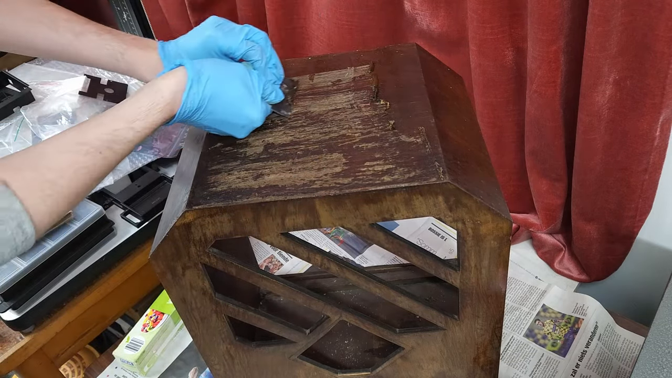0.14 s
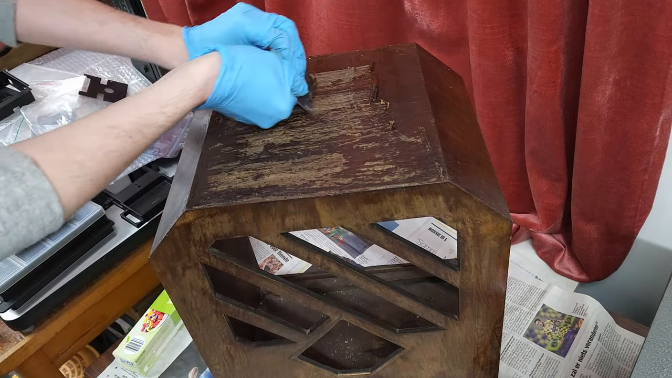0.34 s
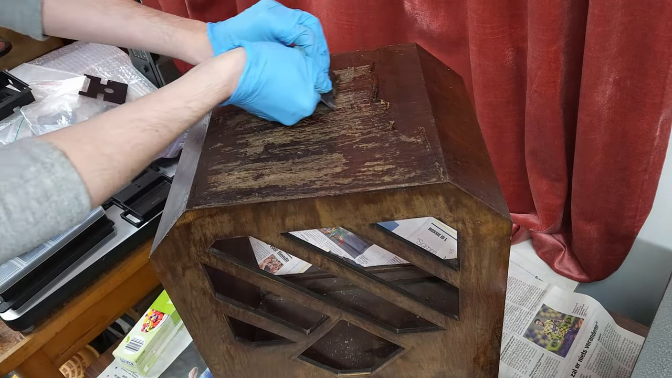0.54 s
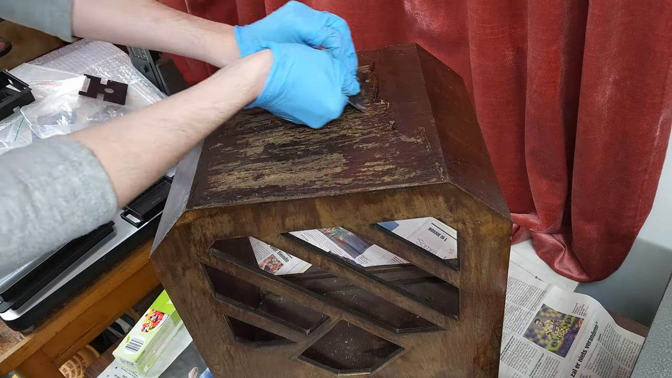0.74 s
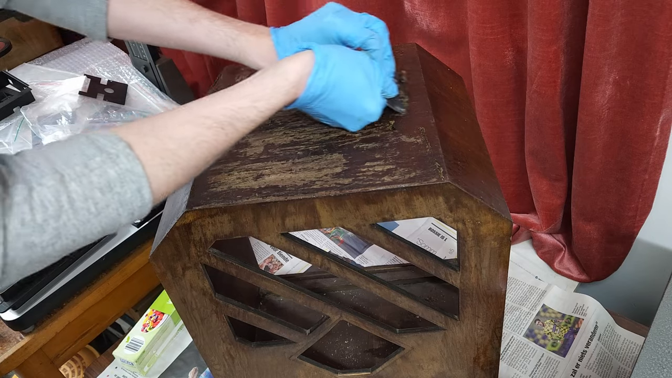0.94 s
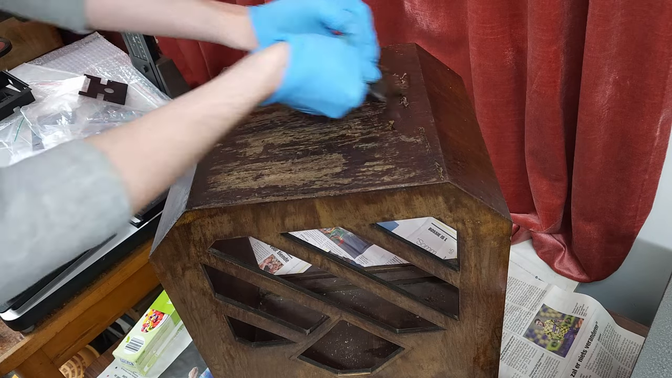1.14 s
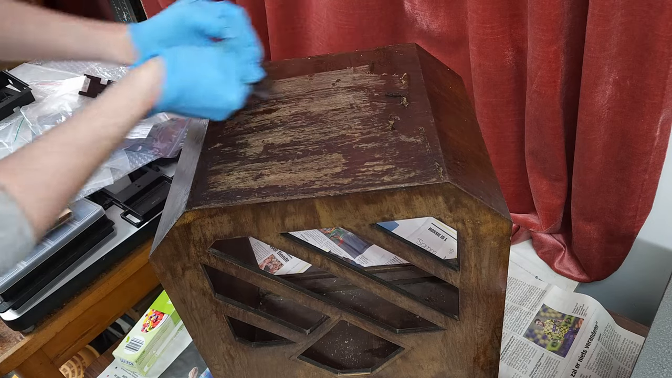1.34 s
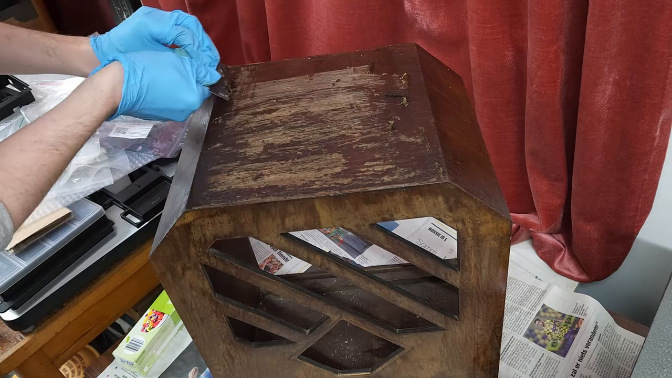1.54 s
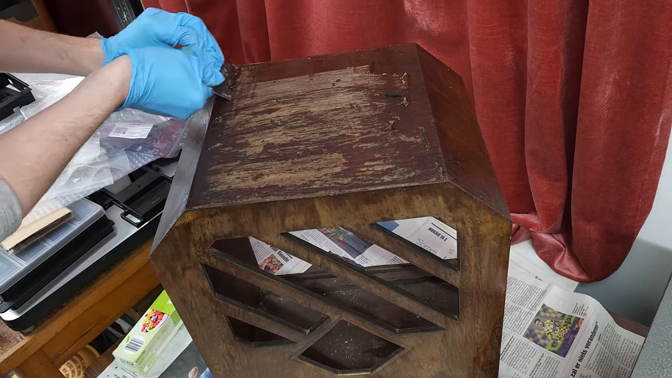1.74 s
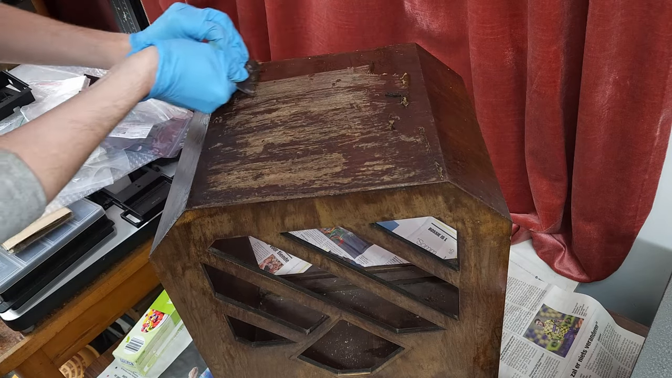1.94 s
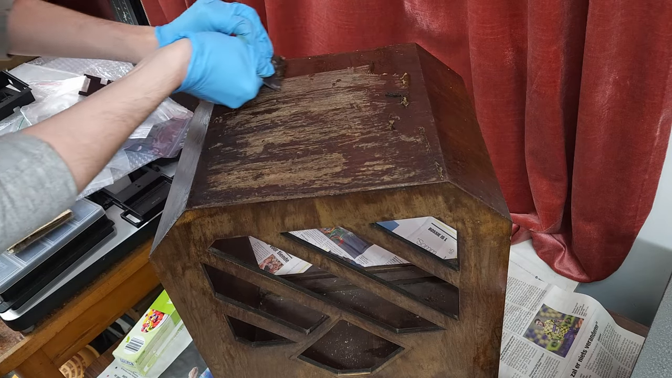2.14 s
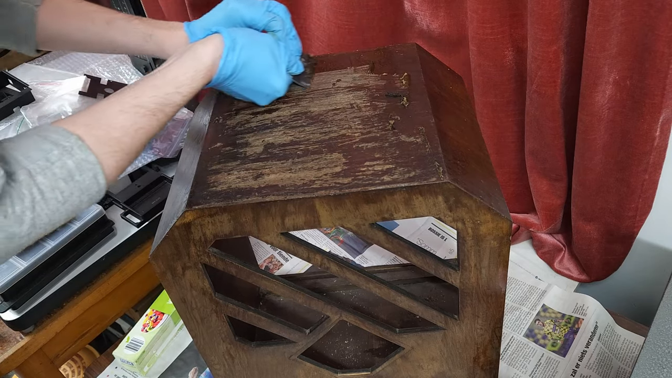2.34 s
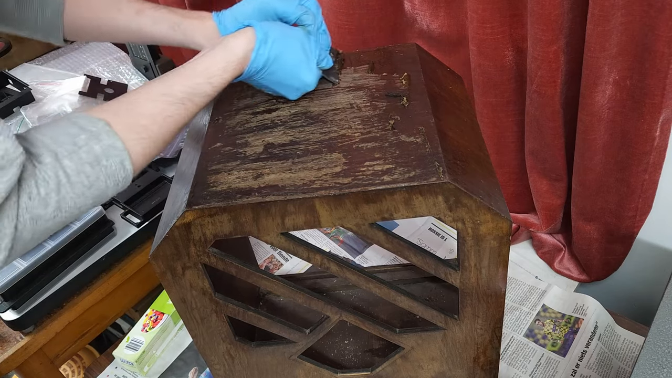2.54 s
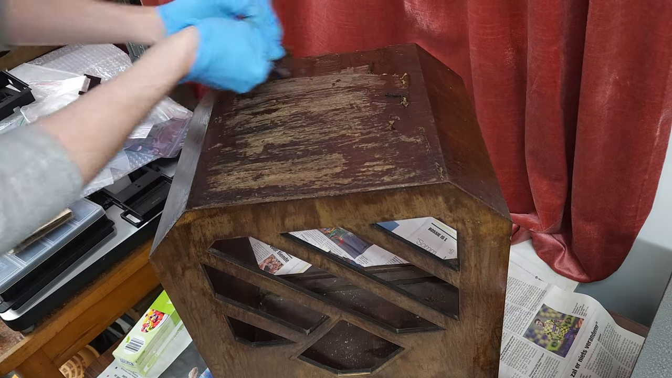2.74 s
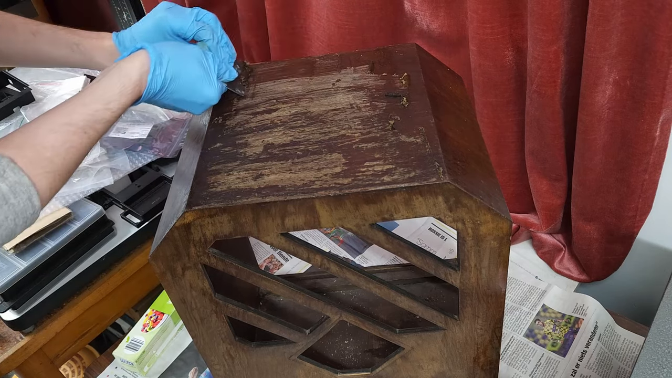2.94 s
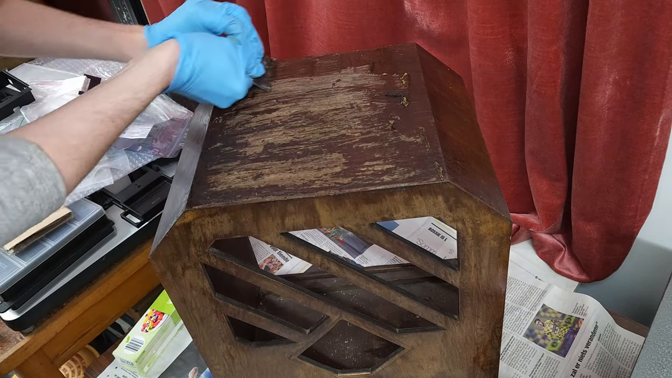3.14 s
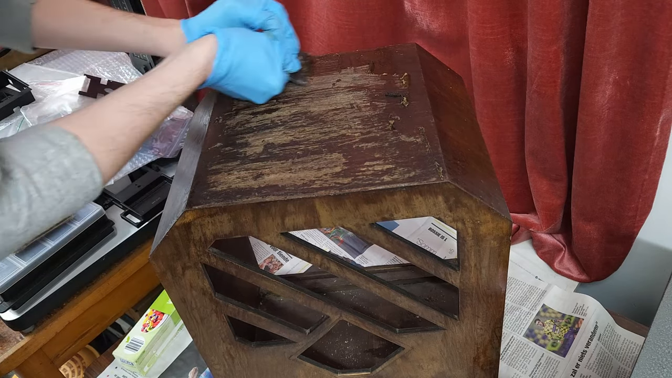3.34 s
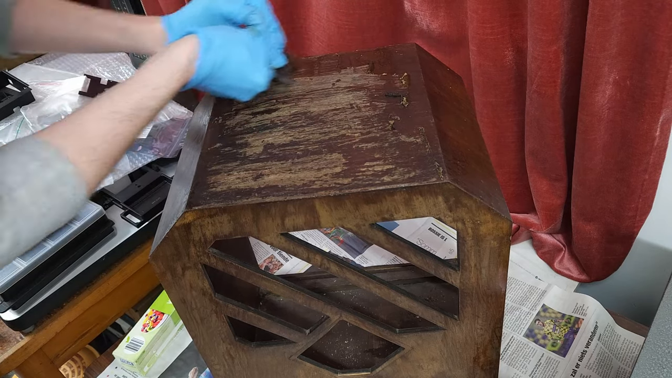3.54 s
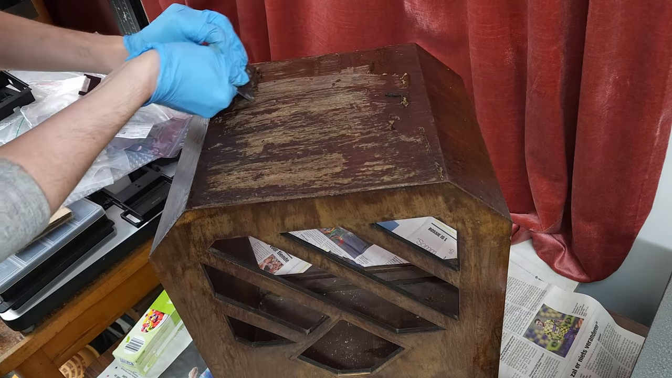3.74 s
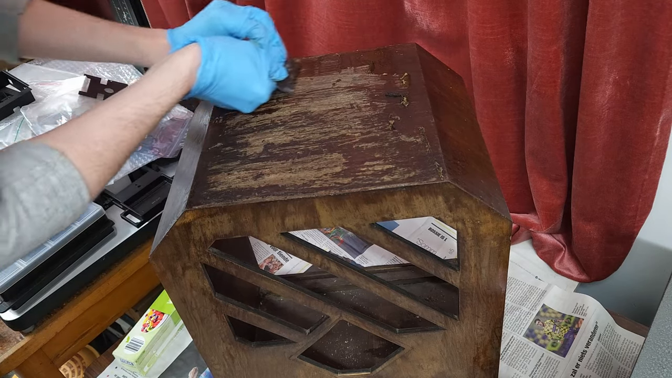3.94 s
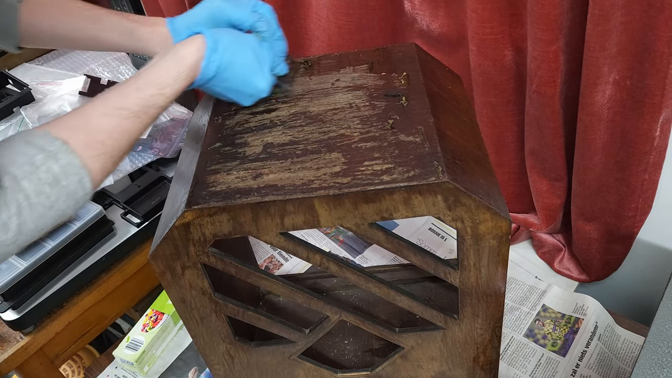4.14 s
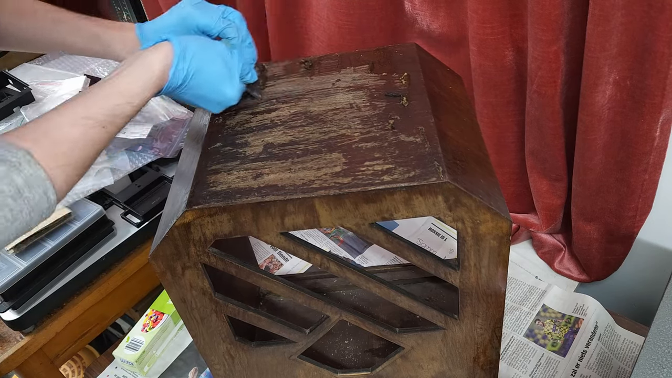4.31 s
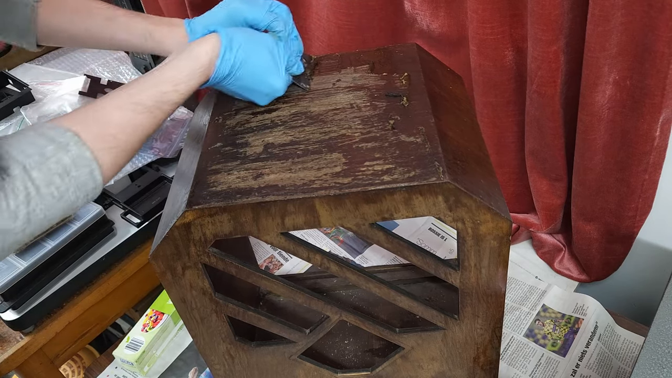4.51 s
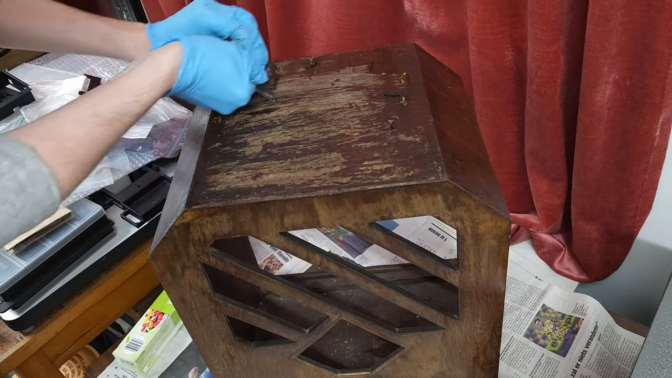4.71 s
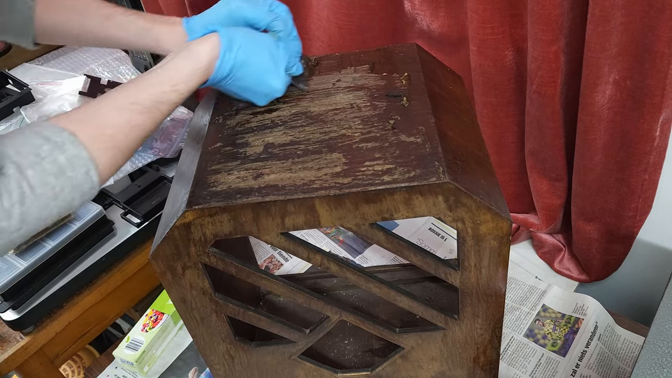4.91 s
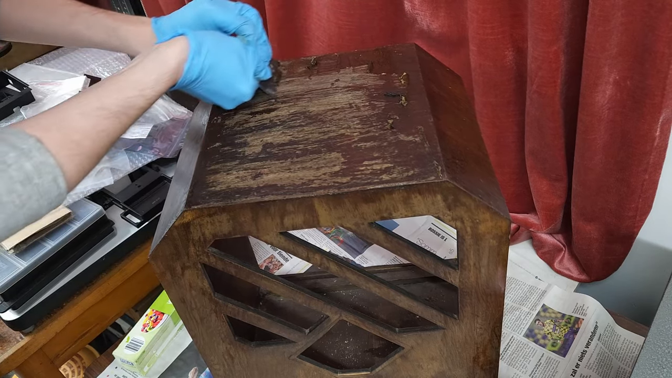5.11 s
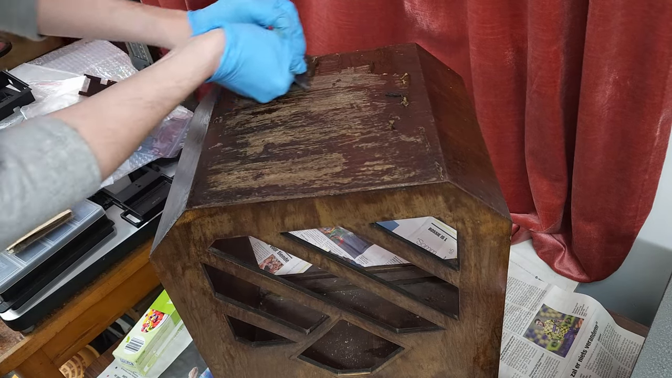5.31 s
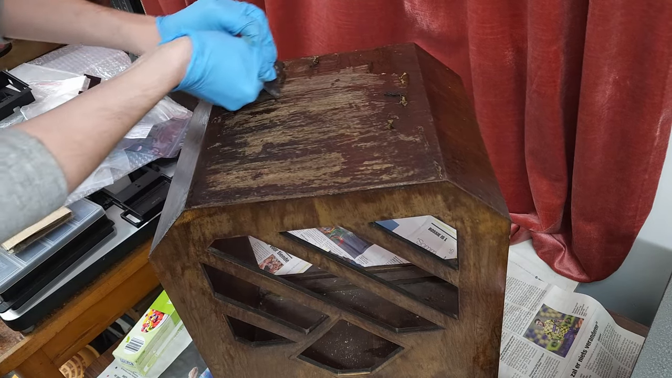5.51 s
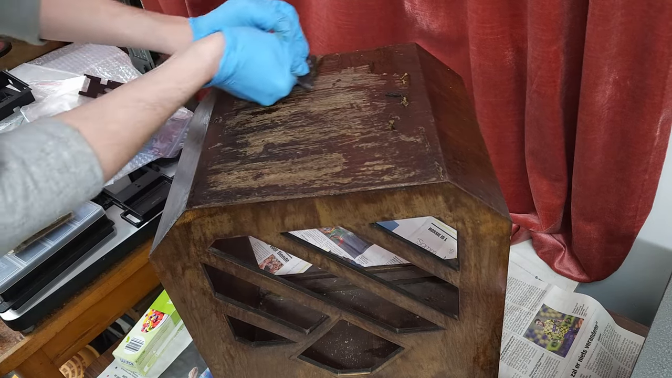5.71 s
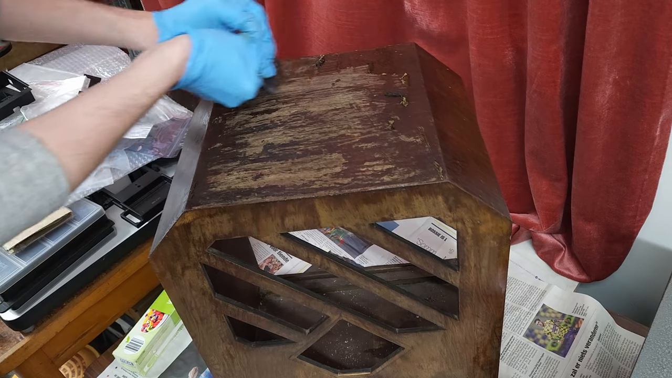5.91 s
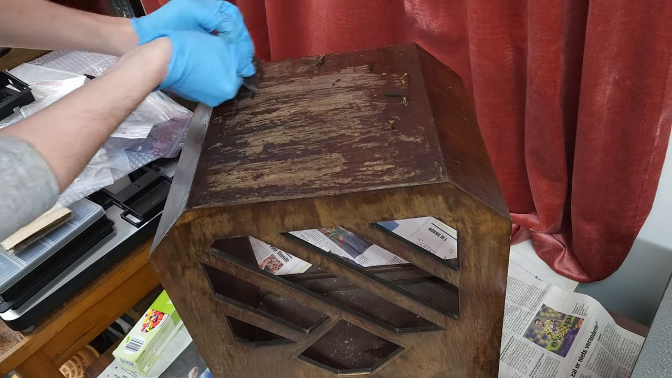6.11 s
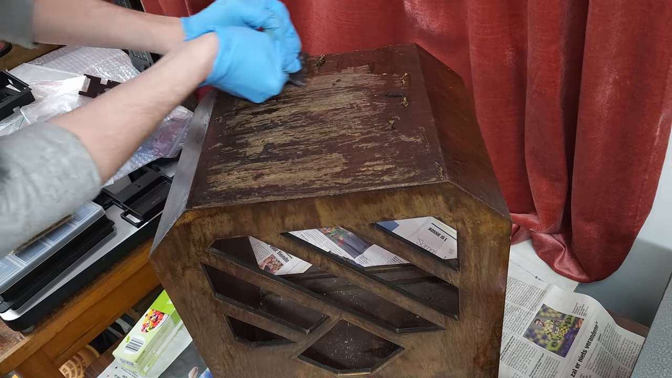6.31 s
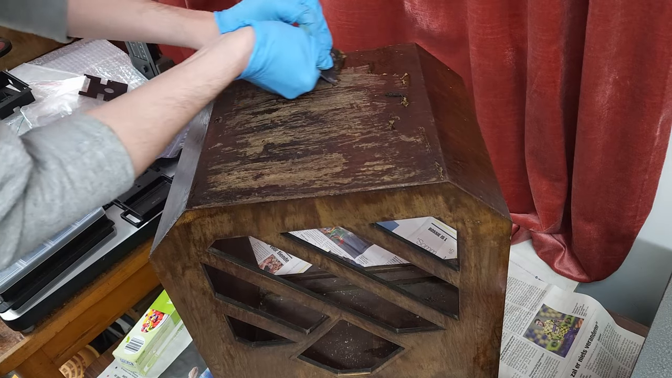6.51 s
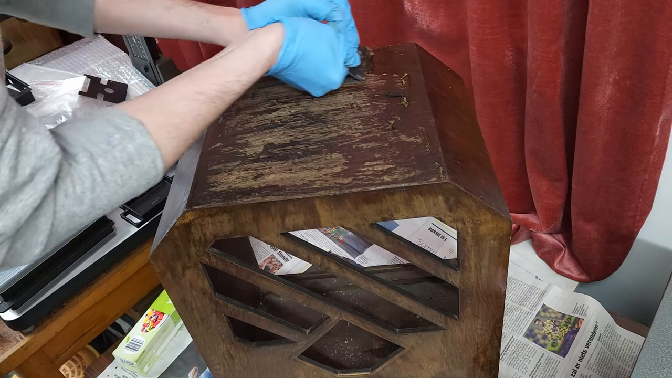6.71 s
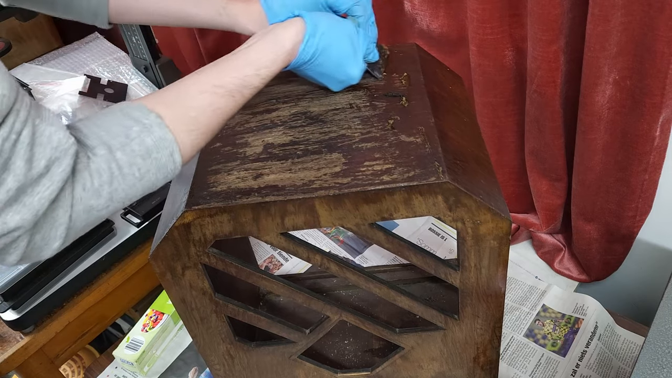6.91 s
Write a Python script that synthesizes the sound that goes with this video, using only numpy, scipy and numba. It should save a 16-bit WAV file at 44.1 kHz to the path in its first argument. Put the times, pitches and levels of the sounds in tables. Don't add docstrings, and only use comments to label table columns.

```python
import sys
import numpy as np
from scipy import signal
from scipy.fft import rfft, irfft, next_fast_len
from scipy.io import wavfile
from scipy.ndimage import uniform_filter1d
from numba import njit

SR = 44100
rng = np.random.default_rng(int(sys.argv[2]) if len(sys.argv) > 2 else 0)


def volts(x):
    e = np.asarray(x, float) / 20
    return 10 ** e


def pcm_store(signal):
    levels = np.round(np.clip(np.atleast_2d(signal), -1, 1) * 32767)
    wavfile.write(sys.argv[1], SR, levels.astype(np.int16).T)


N = 306936
SIZE = next_fast_len(N + SR // 2)
HZ = np.arange(SIZE // 2 + 1) * SR / SIZE + 1e-3
TIME = np.arange(N) / SR

# [t/s, tearing level/dB, brightness of a fast edge/dB,
# load on the wood/dB, panel level as the blade lies over open panel or frame/dB]
FIRST_END = [(0, -52, -5.5, -42, 1.5), (0.105, -53.5, -4.5, -43, 2), (0.235, -64.5, -9, -50, 4.5),
             (0.261, -64.5, -10, -48.5, 2), (0.304, -63.5, -13, -61, 11.5), (0.345, -76, -11, -66, 12)]
FIRST_ACROSS = [(0.344, -66.5, -13.5, -66.5, 13), (.458, -52, -6, -56.5, 4.5), (.616, -51.5, -5, -45, -1.5),
                (.746, -52.5, -4, -53, 3), (.83, -51.5, -4, -51.5, -6), (.878, -56.5, -1.5, -66, -8),
                (.96, -58.5, -2.5, -47.5, -27), (1.024, -63, -2.5, -54, -14), (1.086, -97, 2, -68, 4)]
SECOND_BITE = [(1.72, -100.0, -16.0, -80, -6.0), (1.791, -84.5, -6, -67, -8), (1.894, -56, -6.5, -60, 4),
               (1.92, -58, -0.5, -39, -6.5), (1.971, -52.5, -5.5, -45.5, 5.5), (2.027, -56, -2.5, -35, -6),
               (2.174, -54, -7, -36.5, -5.5), (2.211, -57.5, -5, -50, 7)]
SECOND_ON = [(2.21, -57.5, -6.5, -47.5, 2.9), (2.304, -51, -6.5, -47, 6.2), (2.348, -50.5, -7.5, -37.5, 1),
             (2.428, -52.5, -7.5, -39.5, 1.5), (2.483, -54.5, -4.5, -47.5, 0.5),
             (2.574, -49, -10, -52.5, 4.8), (2.635, -72.5, -2, -52, 6.7)]
SECOND_LIFT = [(2.635, -76, -3, -52, -9), (2.667, -53.5, -2, -65.5, 9), (2.739, -83, 0.5, -59.5, -7),
               (2.86, -112.0, 11, -91, 7)]
THIRD = [(3.04, -83, -10, -65, -15), (3.077, -53.5, -8.5, -41, -4), (3.133, -48, -1, -31.5, 3.5),
         (3.209, -59.5, -6.5, -51.5, 7), (3.274, -50, -7.5, -40.5, -1), (3.431, -50, 0, -44.5, 5.5),
         (3.545, -82.5, -3, -53.5, 1.5), (3.6, -101.5, 12, -77, -4)]
FOURTH = [(3.78, -110, 1, -104, 4), (3.816, -56.5, -6.5, -48.5, 6), (3.879, -48.5, -0.5, -38, -0.5),
          (4.076, -51, -5, -45, 0), (4.124, -72, -4, -69.5, 21.5)]
LAST = [(6.125, -81, -6, -59, -31), (6.178, -55.5, -2.5, -38, 5.5), (6.224, -48, -1.5, -41, 1),
        (6.283, -49.5, 0, -40.5, 0.5), (6.442, -59, -7.5, -50, 5), (6.6, -61.5, -8.5, -59.5, 4.5),
        (6.741, -65.5, -10.5, -67, 5), (6.862, -63.5, -8.5, -59.5, 1), (6.96, -91, -15, -70, 2)]
SLOW_STROKES = (FIRST_END, FIRST_ACROSS, SECOND_BITE, SECOND_ON, SECOND_LIFT, THIRD, FOURTH, LAST)

# [start t/s, end t/s, tearing level/dB, brightness/dB, load level/dB]
PUSHES = [
    (4.363, 4.635, -43, -1.5, -39),
    (4.825, 5.056, -45.5, -3, -41),
    (5.238, 5.46, -41.5, -1, -36),
    (5.64, 5.848, -45.5, -3.5, -47),
]
PULLS = [
    (4.108, 4.401, -49, 1.7, -52),
    (4.587, 4.855, -51, -1.5, -53.5),
    (5.01, 5.257, -50, -0.5, -52),
    (5.415, 5.635, -52, -1, -51.5),
    (5.824, 6.165, -52, 4, -67),
]
# [fastest at/share of length, sharpness, most loaded at/share, its sharpness,
# panel level/dB, brightness lost at the turns/dB, carcass level/dB]
PUSH = (0.4, 3, 0.5, 1, 0.5, 4, -2)
PULL = (0.4326, 3.5, 0.58, 0.6, 6, 12.5, -0.5)
START_DELAY_S = 0.0076
SKIM_DB = 3.5

# [t/s, level/dB]
TICKS = [
    (2.4, -60),
    (3.428, -63),
    (5.09, -59.5),
    (0.49, -83),
]
TICK_S = 0.0077
# [t/s, level/dB, length/s]
LURCHES = [(0.041, -57, 0.042), (0.777, -48.5, 0.06), (0.947, -54.5, 0.058), (2.03, -40.5, 0.044),
           (2.207, -49, 0.017), (2.292, -45.5, 0.037), (3.187, -41, 0.046), (3.87, -58, 0.072),
           (4.05, -49.5, 0.012), (4.393, -45.5, 0.034), (4.91, -46, 0.078), (5.097, -46, 0.029),
           (5.281, -38.5, 0.025), (5.754, -51, 0.074), (6.182, -45, 0.047), (4.128, -53.5, 0.028),
           (1.948, -52, 0.047), (2.495, -54, 0.028), (5.445, -50.5, 0.1)]
# [t/s, level/dB, length/s]
LOCKS = [(3.738, -63, 0.018), (4.297, -43, 0.032), (4.48, -42.5, 0.038), (4.57, -52, .01),
         (4.748, -44, 0.047), (4.967, -43, 0.027), (5.147, -41.5, 0.06), (5.377, -32.5, 0.018),
         (5.944, -54.5, 0.061), (6.065, -46, .028), (3.142, -35, 0.0089), (4.94, -41, 0.012),
         (5.06, -50, 0.022), (5.453, -43.5, 0.022), (6.285, -34, 0.01), (6.397, -36, 0.0065),
         (6.58, -58, .015), (6.66, -50, 0.0071), (6.785, -54.5, 0.013)]
# [t/s, loss/dB, length/s]
FALTERS = [(.22, 16, 0.011), (0.39, 10, 0.022), (0.524, 16, .01), (1.95, 7, 0.016), (2.475, 16, 0.0079),
           (3.208, 11, .01), (3.417, 14, 0.011), (3.487, 20, 0.011), (3.891, 25, 0.0085),
           (4.058, 18, 0.0081), (4.53, 29, 0.01), (4.601, 24, 0.0091), (5.35, 22, 0.0072),
           (5.846, 22, 0.031), (6.245, 8, 0.0087), (6.474, 19, 0.007), (6.602, 18, 0.0091),
           (6.831, 15, .008)]

# [f/Hz, level/dB per Hz]
TEAR = [(500, -15), (800, -15), (1000, -7.5), (2000, -3), (3000, -6), (4200, -10), (6000, -13.5),
        (8000, -15), (9200, -22.5), (9600, -38), (10300, -42.5), (13000, -49), (15700, -46)]
# [f/Hz, width/Hz, level/dB]
GRIP_FIRST = [(1026, 26, 3), (1185, 46, 3.5), (1675, 72, -4.5), (2205, 69, -2.5), (3600, 150, -2.5),
              (4780, 260, -6.5), (5900, 26, -15), (6090, 110, -10), (6420, 29, -7), (6700, 50, -19),
              (7350, 320, -13.5), (8310, 220, -22), (8720, 100, -23)]
GRIP_SLOW = [(930, 137, -6.5), (1210, 49, 3), (1634, 110, -5), (2210, 150, -10), (3676, 150, -8.5),
             (4170, 22, -30), (4800, 155, -7), (5360, 51, -19), (6200, 190, -14), (6470, 60, -19),
             (7350, 230, -12.5), (8240, 56, -14), (8680, 42, -12.5)]
GRIP_QUICK = [(850, 55, -2.5), (1176, 70, 1.5), (1644, 147, -3), (2435, 210, -8.5), (2863, 25, -26),
              (3636, 69, -4.5), (4430, 23, -23), (4760, 180, -11.5), (6150, 150, -11.5), (7200, 104, -14),
              (8580, 130, -21.5)]
GRIP_LAST = [(1134, 88, 2), (1740, 145, -6.5), (2270, 120, -5.5), (2930, 110, -10.5), (3660, 160, 0),
             (4480, 22, -5), (4750, 210, -8), (5450, 52, -10.5), (5900, 170, -14), (6270, 58, -5.5),
             (6500, 180, -17), (7220, 260, -9.5), (8300, 42, -12), (8750, 79, -18)]
# [t/s, its resonances]
GRIPS = [
    (0, GRIP_FIRST),
    (1.4, GRIP_SLOW),
    (3.65, GRIP_QUICK),
    (6.125, GRIP_LAST),
]
# [middle t/s, half length/s, f/Hz, level over the tearing colour/dB]
SINGS = [(0.268, .12, 3630, 18), (0.22, 0.42, 1000, 16), (.3, .1, 2200, 4), (0.48, .07, 660, 13),
         (0.4, 0.2, 1770, 12), (.29, 0.05, 7300, 9), (0.91, 0.17, 1790, 10), (1.016, 0.062, 920, 20.5),
         (1.897, 0.098, 4900, 11), (2.18, 0.35, 880, 13), (2.667, 0.06, 2580, 13.5), (2.68, 0.11, 2400, 12),
         (3.408, 0.099, 2080, 14), (4.6, 0.091, 3200, 14), (5.2, 0.37, 1100, 10), (4.2, 0.37, 1606, 11.5),
         (4.433, 0.049, 2650, 14), (5.3, 0.06, 3300, 16), (4.927, 0.12, 7300, 8), (5.74, 0.12, 1860, 7),
         (2.045, 0.03, 7300, 15), (6.056, 0.038, 1900, 18), (6.37, 0.056, 1750, 15),
         (6.567, 0.11, 3100, 13), (6.677, .1, 3200, 7), (6.804, 0.069, 2400, 11), (4.92, 0.042, 1500, 4),
         (5.345, 0.037, 2200, 9.5), (5.1, 0.06, 3000, 5), (6.5, 0.21, 780, 10), (6.6, 0.086, 1800, 14),
         (2.3, 0.38, 1165, 9)]
DUST_DB, DUST_PER_SHEEN = -15.5, 2.47

# [f/Hz, pitch slip/Hz, level/dB, swing spread/dB]
BOOM = [
    (241, 3.5, 0, 1.6),
    (264, 6, -14, 4),
    (216, 6, -17, 4),
    (289, 8, -18, 4),
]
# [f/Hz, width/Hz, level/dB]
PANELS = [(409, 34.4, -4), (476.5, 20.6, -1), (512.6, 18.8, -0.5), (559.2, 7.7, 1.5), (597.8, 16.3, -3.5),
          (654, 11.2, 0), (744, 45, -14.5), (817, 40, -14.5), (865, 64, -13.5)]
# [f/Hz, width/Hz, level/dB]
CARCASS = [(62.4, 21, -22), (143.4, 21, -1.5), (206.5, 30.2, -0.5)]
# [f/Hz, width/Hz]
HOLLOWS = [(95, 21), (325, 16)]
PANEL_DB, PANEL_FOLLOWS_LOAD = -4, 0.62
CARCASS_DB, CARCASS_FOLLOWS_LOAD = -4, 0.49
WOOD_RING_S = 0.0024
WOOD_TOP_HZ = 4000
# [t/s, length/s, f/Hz, level/dB]
PANEL_SWELLS = [(0.08, 0.01, 480, -54), (0.08, 0.027, 527, -59), (0.103, 0.028, 559, -49),
                (2.015, 0.029, 462, -46.5), (2.085, 0.015, 517, -50), (2.09, 0.023, 409, -50),
                (2.11, 0.025, 467, -52), (2.345, 0.026, 563, -52), (2.376, 0.025, 468, -59),
                (2.377, 0.032, 416, -59), (2.463, 0.039, 650.4, -52.5), (3.128, 0.018, 480, -48),
                (3.143, 0.026, 527, -51), (3.274, 0.049, 409, -55), (3.328, 0.023, 566, -54),
                (3.332, 0.023, 474, -46.5), (3.424, 0.03, 654, -49), (3.431, 0.018, 484, -46),
                (3.437, 0.038, 403, -50.5), (3.87, 0.031, 416, -52.5), (3.881, 0.022, 516, -46.5),
                (3.891, 0.042, 473, -53), (3.913, 0.01, 667, -49.5), (4.052, 0.014, 646, -54),
                (4.428, 0.025, 600, -56), (4.446, 0.023, 640, -56), (4.487, 0.045, 417, -56),
                (4.525, 0.029, 521, -49), (4.535, 0.015, 466, -48.5), (4.689, 0.019, 533, -53.5),
                (4.864, 0.021, 409, -53), (4.934, 0.016, 655, -53), (4.937, 0.027, 594, -48.5),
                (4.959, 0.017, 512, -50), (5.313, 0.037, 476, -57), (5.323, 0.022, 524, -45.5),
                (5.35, 0.017, 651, -44.5), (5.553, 0.023, 662, -50.5), (5.697, 0.021, 463, -54),
                (5.712, 0.019, 515, -51), (6.191, 0.015, 465, -46), (6.274, 0.013, 597, -58),
                (6.28, 0.015, 647, -46.5), (6.292, 0.018, 471, -43.5), (6.38, 0.017, 500, -48.5)]

# [t/s, peak level/dB, f/Hz, t60/s]
SWAYS = [(0.549, -62, 68, 0.52), (2.711, -56, 78.1, 0.4), (2.799, -65, 62.5, 0.52), (4.549, -58, 75, 0.58),
         (5.289, -53.5, 74.4, 0.94), (5.419, -58, 52, 0.55), (5.719, -67, 71, 0.5),
         (6.249, -58, 51.7, 0.54)]
# [t/s, peak level/dB, f/Hz, t60/s]
THUDS = [(1.388, -68, 232, 0.12), (2.241, -26, 250, 0.049), (2.705, -45.5, 189.3, 0.33),
         (2.738, -38, 141, 0.11), (3.725, -59, 432, 0.13), (3.816, -35.5, 218, 0.13),
         (6.151, -30, 247, 0.17), (6.278, -35, 263, 0.12), (6.869, -43.5, 248, 0.06),
         (6.911, -42.5, 140, 0.12)]

# [t/s, peak level/dB, treble level re peak/dB, favoured ring f/Hz, its level/dB]
TAPS = [(1.124, -70.5, -9, 1890, -6), (1.15, -86.5, -12, 7200, 19.5), (1.662, -54, -15, 1060, 2.5),
        (1.652, -77, -6, 4660, 9), (1.664, -69, -11, 4750, 13), (1.708, -83, -5, 4730, 6),
        (2.038, -64, 8, 1240, -9), (2.9582, -43.5, -7.5, 2600, -3), (2.967, -50, -16, 1280, -1),
        (1.54, -86, -30, 1600, 10), (3.424, -38.5, -20, 1210, 1.5), (3.708, -69, -26, 830, 7),
        (3.725, -68.5, -29, 1790, 11.5), (3.726, -82, -25, 3550, -5), (3.812, -55, -18, 864, -10),
        (4.395, -40, -9, 1180, -26), (4.854, -47, -30, 1180, -1), (5.266, -39.5, -10, 1590, -9),
        (5.665, -49, -12, 1220, -16), (5.9842, -36.5, -13, 1510, 7.5), (5.998, -52, -15, 2340, -2),
        (6.019, -38.5, -18, 1490, 4), (6.028, -42, -19, 2100, -6), (6.043, -45.5, -24, 1690, -2)]
# [f/Hz, width/Hz, level/dB]
LOOSE = [(257, 34, -2), (490, 170, -6.5), (855, 300, -3.5), (1240, 71, 3), (2240, 49, -4), (3060, 350, -12),
         (3400, 330, -8), (5170, 570, -2.5), (6100, 360, -39), (7660, 400, -16)]
TAP_T60_S = 0.12
CRACK_DB, CRACK_T60_S = 0.5, 0.042

# [f/Hz, level/dB per Hz]
HUSH = [(26, -49), (45, -15), (226, -7), (318, -17.5), (351, -9), (378, -14.5), (459, -25), (519, -13),
        (713, -28), (1000, -19), (1190, -33), (1600, -28), (2810, -38.5), (3090, -34), (9000, -36.5),
        (9800, -46), (11000, -34), (15500, -36)]
HUSH_DB = -76
# [f/Hz, level re shared/dB]
UNLIKE = [(60, -11), (250, -12.5), (600, -5), (1200, -2), (2200, -5.5), (4500, 1), (8000, 6.5), (12000, 7)]
# [f/Hz, level re right port/dB]
LEFT_PORT = [(250, 0.3), (600, -0.74), (10000, -1.5)]
PORT_LAG_S = 1e-4
ROOM_T60_S, ROOM_DB, ROOM_FROM_HZ = 0.093, -2.5, 630


def unit(x):
    return x / np.sqrt(np.mean(np.abs(x) ** 2))


def shape(x, response):
    return irfft(rfft(x, SIZE) * response, SIZE)[..., :N]


def modes(table):
    response = 0
    for k, (hz, width, db) in enumerate(table):
        damping = 1j * HZ * width
        response = response + (-1) ** k * volts(db) * damping / (hz * hz - HZ ** 2 + damping)
    return response


def colour(table):
    hz, db = np.transpose(table)
    return volts(np.interp(np.log(HZ), np.log(hz), db))


def joined(values, rate):
    return np.interp(TIME * rate, np.arange(len(values)), values)


def walk(rate):
    return joined(rng.standard_normal(int(N * rate // SR + 2)), rate)


def wander(rate, spread_db):
    return joined(volts(spread_db * rng.standard_normal(int(N * rate // SR + 2))), rate)


def threefold(x):
    return np.array([np.roll(x, k * N // 3) for k in range(3)])


def hump(s, length):
    at = slice(max(int((s - 4 * length) * SR), 0), int((s + 4 * length) * SR))
    return at, np.exp(-((TIME[at] - s) / length) ** 2)


@njit
def resonate(x, g, k):
    y, b, l = np.empty_like(x), np.zeros(len(x)), np.zeros(len(x))
    for i in range(x.shape[1]):
        c = 1 / (1 + g[i] * (g[i] + k))
        for row in range(len(x)):
            v = (b[row] + g[i] * (x[row, i] - l[row])) * c
            b[row] = 2 * v - b[row]
            l[row] += 2 * g[i] * v
            y[row, i] = k * v
    return y


def layers(tear_db, sheen_db, load_db, panel_db, carcass_db=0):
    sheen_db = np.clip(sheen_db, -16, 3)
    dust_db = tear_db + DUST_DB + DUST_PER_SHEEN * sheen_db

    def blend(share):
        return share * load_db + (1 - share) * tear_db

    panels_db = blend(PANEL_FOLLOWS_LOAD) + PANEL_DB + panel_db
    body_db = blend(CARCASS_FOLLOWS_LOAD) + CARCASS_DB + carcass_db
    return volts(2 * np.array([tear_db, tear_db + sheen_db, dust_db, load_db, panels_db, body_db]))


def arch(share, top, sharp):
    bent = share ** (np.log(0.5) / np.log(top))
    return 20 * sharp * np.log10(np.sin(np.pi * bent) + 1e-3)


def hands():
    power = np.full((6, N), 1e-12)
    for table in SLOW_STROKES:
        s, *columns = np.transpose(table)
        on = (TIME >= s[0]) & (TIME < s[-1])
        power[:, on] += layers(*[np.interp(TIME[on], s, c) for c in columns])
    for table, run in ((PUSHES, PUSH), (PULLS, PULL)):
        fastest, sharp, loaded, load_sharp, panel_db, turn_db, carcass_db = run
        for start, end, tear_db, sheen_db, load_db in table:
            start = start + START_DELAY_S
            on = (TIME >= start) & (TIME < end)
            share = (TIME[on] - start) / (end - start)
            tearing = tear_db + np.minimum(arch(share, fastest, sharp) + SKIM_DB, 0)
            sheen = sheen_db - turn_db * (1 - np.sin(np.pi * share))
            load = load_db + arch(share, loaded, load_sharp)
            power[:, on] += layers(tearing, sheen, load, panel_db, carcass_db)
    ticks = [(s, db, TICK_S) for s, db in TICKS]
    for layer, table in ((5, LURCHES), (3, LOCKS), (2, ticks)):
        for s, db, length in table:
            at, bell = hump(s, length)
            power[layer, at] += volts(2 * db) * bell
    keep = np.exp(-1 / (WOOD_RING_S * SR))
    power[3] = signal.lfilter([1 - keep], [1, -keep], power[3], zi=[keep * power[3, 0]])[0]
    for s, lost_db, length in FALTERS:
        at, bell = hump(s, length)
        power[3, at] *= volts(-2 * lost_db * bell)
    db = 10 * np.log10(power)
    return (db[0], db[1] - db[0], db[2] - db[0]), db[3:]


def grit(spread_db, patchy_db, slip_db):
    sizes = volts(spread_db * rng.exponential(size=(3, N)))
    sizes = sizes * wander(45, patchy_db) * wander(220, slip_db)
    return unit(rng.standard_normal((3, N)) * sizes)


def steel(force):
    out = volts(3.0) * force
    tear_hz, tear_db = np.transpose(TEAR)
    edges = [int(s * SR) for s, _ in GRIPS] + [N]
    drifts = [(1 + 0.018 * walk(12), wander(14, spread_db=3.2)) for _ in range(14)]
    for a, b, (_, grip) in zip(edges, edges[1:], GRIPS):
        held = force[:, a:b].copy()
        for (hz, width, db), (bend, wax) in zip(grip, drifts):
            g = np.tan(np.pi * hz / SR) * bend[a:b]
            over_db = db + 3.5 - np.interp(np.log(hz), np.log(tear_hz), tear_db)
            out[:, a:b] += volts(over_db) * wax[a:b] * resonate(held, g, width / hz)
    for s, length, hz, db in SINGS:
        a, b = max(int((s - length) * SR), 0), min(int((s + length) * SR), N)
        g = np.full(b - a, np.tan(np.pi * hz / SR))
        ring = resonate(force[:, a:b].copy(), g, 70 / hz)
        out[:, a:b] += volts(db) * np.hanning(b - a) * ring
    return out


def blade(rasp_db, sheen_db, dust_db):
    high = 1 / (1 + (3500 / HZ) ** 6)
    top = 1 / (1 + (9800 / HZ) ** 40)
    force = grit(spread_db=1.0, patchy_db=1.6, slip_db=1.3)
    ring = rfft(steel(force), SIZE) * colour(TEAR)
    rasp = (1 - high, rasp_db)
    sheen = (high * (1 - top), rasp_db + sheen_db)
    dust = (top, rasp_db + dust_db + 0.7 * walk(140))
    return sum(volts(db) * unit(irfft(ring * part, SIZE)[:, :N]) for part, db in (rasp, sheen, dust))


def boom(db):
    out = np.zeros(N)
    for hz, slip_hz, own_db, spread_db in BOOM:
        phase = 2 * np.pi * np.cumsum(hz + slip_hz * walk(22)) / SR
        out += volts(own_db) * wander(16, spread_db) * np.sin(phase)
    return threefold(unit(out)) * volts(db)


def judder(table, db, locked):
    force = rng.standard_normal(N) * wander(25, spread_db=1.5)
    ring = unit(shape(force, modes(table)))
    swing = np.sqrt(2 * uniform_filter1d(ring ** 2, size=SR // 60) + 1e-9)
    evened = unit(ring / (swing + 0.095) ** locked)
    return threefold(evened) * volts(db)


def cabinet(boom_db, panel_db, carcass_db):
    panels = judder(PANELS, panel_db, locked=0.27)
    carcass = judder(CARCASS, carcass_db, locked=0.085)
    wood = boom(boom_db) + panels + carcass
    wood[0] += thuds(THUDS, swell_s=0.0022) + swells()
    gaps = np.prod([1 - 0.52 * modes([(hz, width, 0)]) for hz, width in HOLLOWS], axis=0)
    return shape(wood, gaps / (1 + (HZ / WOOD_TOP_HZ) ** 4))


def hush():
    alike = 1 / (1 + (HZ / 500) ** 2)
    tone = colour(HUSH) * (volts(-13.0) + 1 / (1 + (HZ / 9300) ** 30))
    mid, side = rng.standard_normal((2, N)) * wander(5.6, spread_db=1.5)
    mid = shape(mid, tone * np.sqrt(1 + alike))
    side = shape(side, tone * np.sqrt(1 - alike))
    return unit(np.array([mid + side, mid - side])) * volts(HUSH_DB + 2.5)


def swells():
    out = np.zeros(N)
    for s, length, hz, db in PANEL_SWELLS:
        at = slice(max(int((s - 3 * length) * SR), 0), int((s + 3 * length) * SR))
        t = TIME[at] - s
        bell = np.exp(-0.5 * (t / length) ** 2)
        out[at] += volts(db + 4.0) * bell * np.sin(2 * np.pi * (hz * t + rng.random()))
    return out


def thuds(table, swell_s):
    out, t = np.zeros(N + SR), TIME[:SR]
    swell = 1 - np.exp(-t / swell_s)
    for s, db, hz, t60 in table:
        at = slice(int(s * SR), int(s * SR) + SR)
        out[at] += volts(db - 60 * t / t60) * swell * np.sin(2 * np.pi * hz * t)
    return out[:N]


def taps():
    noise = threefold(rng.standard_normal(N))
    loose = rfft(noise[0], SIZE) * (modes(LOOSE) + volts(-10.5) / (1 + (800 / HZ) ** 4))
    high = 1 / (1 + (3200 / HZ) ** 6)
    low, treble = (threefold(unit(irfft(loose * part, SIZE)[:N])) for part in (1 - high, high))
    chatter = wander(550, spread_db=3.0)
    lead_s = 0.04
    out, t = np.zeros((3, N)), TIME[:SR // 3] - lead_s
    skid = volts(-60 * np.abs(t) / TAP_T60_S)
    crack = volts(CRACK_DB - 60 * np.abs(t) / CRACK_T60_S)
    landing = (skid + crack) * np.clip(t / 0.00064, 0, 1)
    brush = volts(-20 - 60 * np.abs(t) / 0.13)
    for s, db, treble_db, hz, ring_db in TAPS:
        start = int((s - lead_s) * SR)
        at = slice(start, start + len(t))
        g = np.full(len(t), np.tan(np.pi * hz / SR))
        favoured = unit(resonate(noise[:, at].copy(), g, 0.12))
        burst = low[:, at] + volts(treble_db + 11.5) * treble[:, at] + volts(ring_db) * favoured
        out[:, at] += volts(db - 13.5) * (landing + brush) * burst
    band = signal.cheby2(9, 50, (150, 10100), "band", fs=SR, output="sos")
    return signal.sosfilt(band, out * chatter)


def workshop(near):
    tail = TIME[:SR // 2]
    echoes = rng.standard_normal((2, len(tail))) * volts(-60 * tail / ROOM_T60_S) * (tail > 0.002)
    echoes = rfft(echoes / np.sqrt(np.sum(echoes ** 2, axis=1, keepdims=True)), SIZE)
    return shape(near, 1 + volts(ROOM_DB) * echoes / (1 + (ROOM_FROM_HZ / HZ) ** 2))


def scene():
    edge, wood = hands()
    sound = blade(*edge) + taps() + cabinet(*wood)
    shared = sound[0] + thuds(SWAYS, swell_s=0.005)
    alone = colour(UNLIKE)
    total = np.sqrt(1 + alone ** 2)
    ports = np.array([colour(LEFT_PORT), np.exp(-2j * np.pi * HZ * PORT_LAG_S)])
    near = shape(shared, ports / total) + shape(sound[1:], alone / total)
    return workshop(near) + hush()


def roll_off(x):
    return signal.sosfilt(signal.butter(12, 15690, fs=SR, output="sos"), x)


def record(dry):
    rumble_cut = signal.butter(2, 48.6, "high", fs=SR, output="sos")
    mix = signal.sosfilt(rumble_cut, dry)
    return roll_off(mix)


dry = scene()
out = record(dry)
pcm_store(out)
```